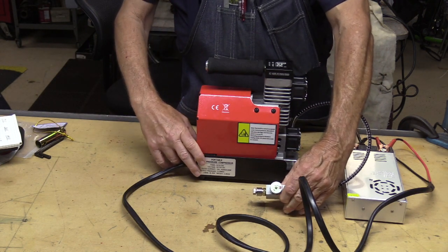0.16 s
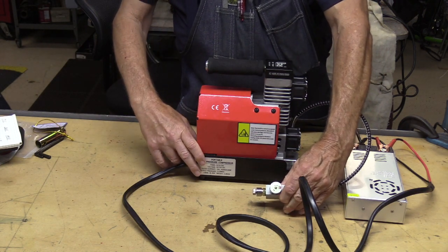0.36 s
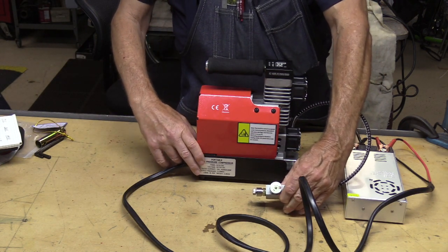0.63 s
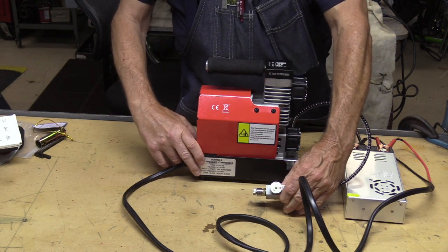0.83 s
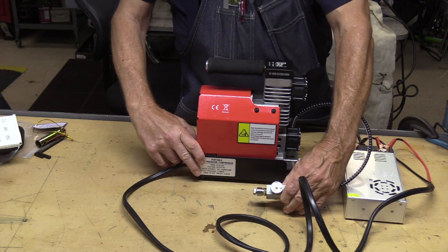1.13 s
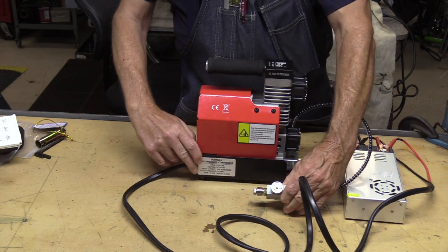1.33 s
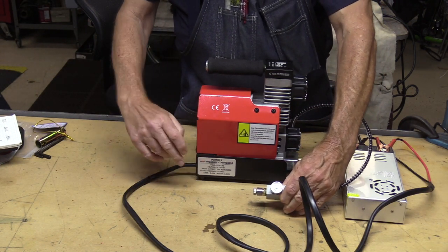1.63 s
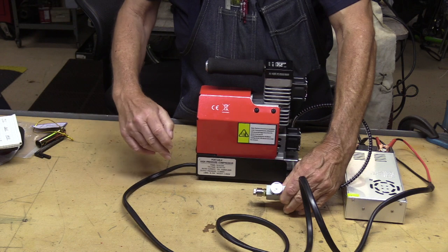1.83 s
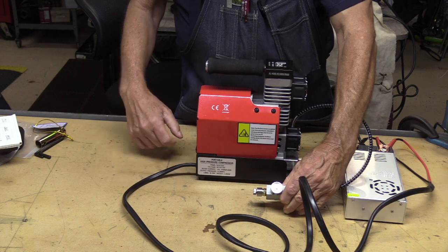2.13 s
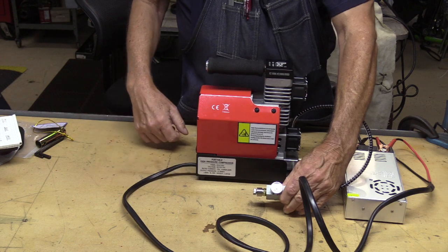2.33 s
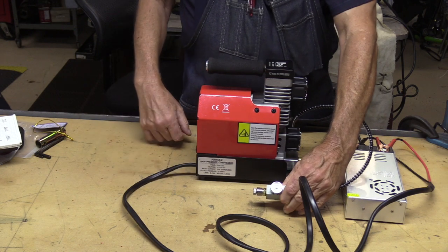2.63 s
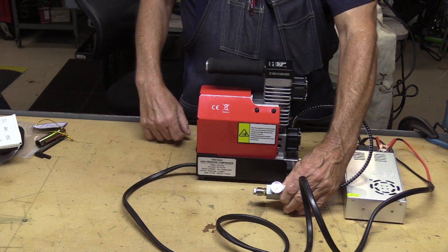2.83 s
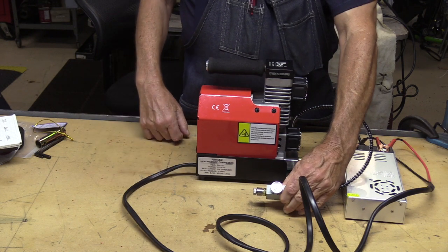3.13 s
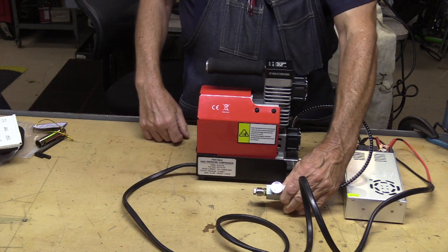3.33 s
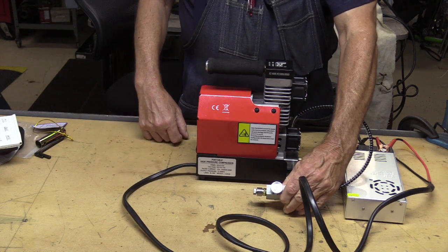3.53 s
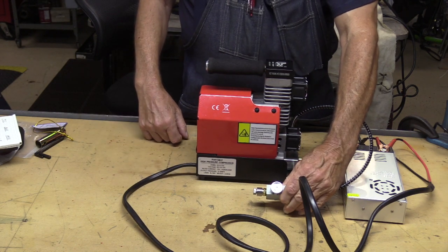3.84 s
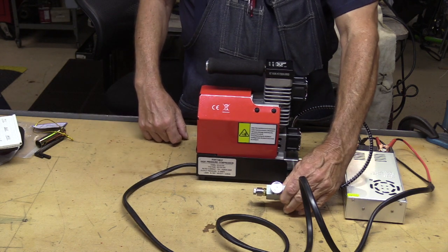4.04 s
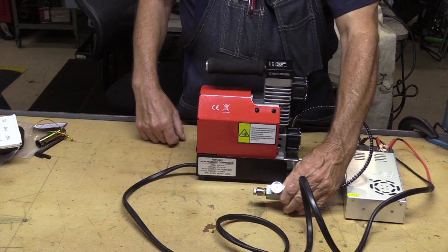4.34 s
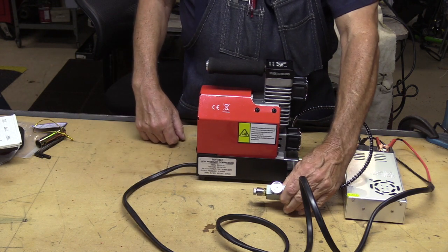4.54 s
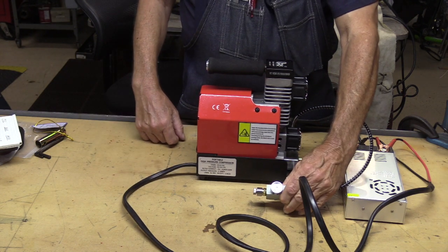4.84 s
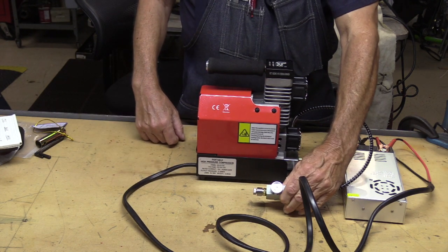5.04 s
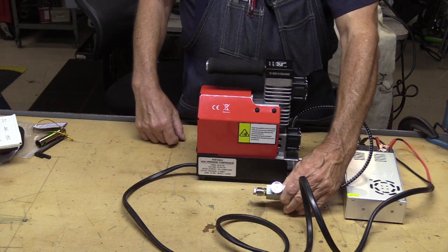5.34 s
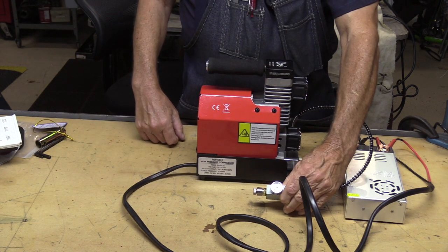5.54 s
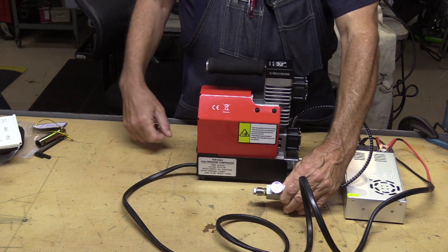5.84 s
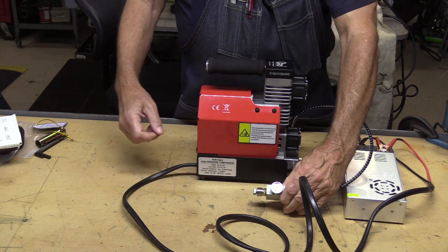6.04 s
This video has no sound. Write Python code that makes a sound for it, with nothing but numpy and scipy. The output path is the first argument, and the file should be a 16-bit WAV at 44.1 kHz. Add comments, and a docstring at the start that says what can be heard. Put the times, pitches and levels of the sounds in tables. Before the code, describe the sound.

Steady high fan whine and airflow; after a second a small compressor snaps on, its rapid thumping and hooting pulses growing fuller, close up.

```python
"""A small high-pressure air compressor on a workbench, close to the microphone: two cooling fans whine as
blade-rate tones over rushing air, which is coloured noise, and a thin hum. After a second come a clunk and a
spit of air, a switch tocks, the motor rumbles up as shaped noise and a gear tone, and the sagging supply slows
both fans. On every stroke the intake reed hoots (tone bursts), the valve thumps (low pulses), air spurts and
the head rattles (noise), and the piston knocks on the crankcase (ringing modes)."""
import sys
import numpy as np
from scipy import signal
from scipy.fft import rfft, irfft
from scipy.io import wavfile

SR = 44100
rng = np.random.default_rng(int(sys.argv[2]) if len(sys.argv) > 2 else 0)


def inscribe(sig):
    """Save sig as 16-bit PCM at rate SR to the path in sys.argv[1].

    A 1-D sig is mono; a 2-D sig holds one channel per row.
    Samples are clipped to [-1, 1] before scaling.
    """
    pcm = np.round(np.clip(np.atleast_2d(sig).T, -1, 1) * 32767)
    wavfile.write(sys.argv[1], SR, pcm.astype(np.int16))


N = 272570
TIME = np.arange(N) / SR  # s


def undb(db):
    """Decibels to gain."""
    return 10 ** (np.asarray(db) / 20)


def unit(x):
    """Scale to rms 1."""
    return x / np.std(x)


def curve(rows):
    """Each column of a timed table, interpolated sample by sample."""
    s, *columns = np.transpose(rows)
    return [np.interp(TIME, s, column) for column in columns]


def walk(rate_hz):
    """Smooth chance of spread 1 that changes about rate_hz times a second."""
    rolloff = 1 + (np.fft.rfftfreq(N, 1 / SR) / rate_hz) ** 2
    return unit(irfft(rfft(rng.standard_normal(N)) / rolloff, N))


def colour(x, points, peaks=()):
    """Filter by a broad spectrum with the power of resonances added; rms 1."""
    f = np.fft.rfftfreq(N, 1 / SR) + 1e-3  # keeps the logarithm finite
    hz, db = np.transpose(points)
    power = undb(np.interp(np.log(f), np.log(hz), db)) ** 2
    for centre_hz, width_hz, peak_db in peaks:
        power = power + undb(peak_db) ** 2 / (1 + ((f - centre_hz) / width_hz) ** 2) ** 2
    return unit(irfft(rfft(x) * np.sqrt(power), N))


def add(out, s, sound):
    """Mix a short sound in at time s."""
    i = int(np.clip(s * SR, 0, N))
    out[i:i + len(sound)] += sound[:N - i]


def burst(hz, length_s):
    """A tone that swells and dies within length_s, symmetric about its middle."""
    n = int(length_s * SR)
    return np.hanning(n) * np.cos(2 * np.pi * hz * (np.arange(n) - n / 2) / SR)


def ring(hz, t60_s, t, wave=np.sin):
    """A struck mode that falls by 60 dB in t60_s."""
    return wave(2 * np.pi * hz * t) * np.exp(-np.log(1000) * t / t60_s)


# Brief level changes, relative: middle_s, length_s, whine_db [dB], air_db [dB]
DIPS = [(0.406, .14, 1, -1.5), (0.703, 0.12, -30, -2), (1.033, .1, 0, -2), (1.39, 0.28, -2.5, -2),
        (1.68, 0.15, -19, -1), (2.1, 0.17, -5.5, -2), (2.25, 0.13, -4, -1.9), (2.57, 0.14, -12, -2),
        (2.886, 0.24, -3, -1.2), (4.46, 0.13, -7.5, -2), (4.76, 0.12, -4, -2.2), (5.815, 0.13, -4, -1.7)]


def dips():
    """Smooth brief level changes in dB: one row for the whine, one for the air."""
    whine, air = np.zeros((2, N))
    for s, length_s, whine_db, air_db in DIPS:
        shape = np.hanning(int(length_s * SR))
        add(whine, s - length_s / 2, whine_db * shape)
        add(air, s - length_s / 2, air_db * shape)
    return whine, air


SWITCH_S = 1.047  # the power switch snaps
EASING_S = 18  # time constant of the easing of the pump's running load


def fan_speed(idle_hz, slowing_s, inrush_hz, recover_s, load_hz, wander_hz):
    """The pump's inrush drags a fan's blade rate down; it recovers to a little under its idle rate."""
    t = np.maximum(TIME - SWITCH_S, 0)
    load = inrush_hz * np.exp(-t / recover_s) + load_hz * np.exp(-t / EASING_S)
    sag = (1 - np.exp(-t / slowing_s)) * load
    return idle_hz - sag + wander_hz * walk(1.96)


def fan(hz, db, tones, flutter_db, flutter_hz, wobble, count=1):
    """Tones on multiples of blade rate / count; turbulent inflow shakes their level and phase (radians)."""
    phase = 2 * np.pi * np.cumsum(hz / count) / SR
    out = 0
    for multiple, tone_db, share in tones:
        swing_db = share * (db - db.mean()) + flutter_db * walk(flutter_hz)
        level = undb(db.mean() + tone_db + swing_db)
        out = out + level * np.sin(multiple * phase + wobble * walk(flutter_hz))
    return np.sqrt(2) * out


# Blade rates of the two fans before the pump loads the supply
MAIN_HZ, SMALL_HZ = 1848.5, 1685
# Tones of the louder fan: multiple of its blade rate, relative level_db, share of the level swings [0-1]
MAIN_TONES = [(1, 0, 0.64), (2, -22.5, 0.7)]
# Tones of the smaller, five-bladed fan: multiple of its shaft rate, relative level_db, share of swings [0-1]
SMALL_TONES = [(1, -11.5, 0.35), (5, -0.5, 0.2), (10, -4, 0.28), (15, 0.5, 0.8)]
# Loudness of the louder fan, before trim: time_s, level_db
MAIN_LEVEL = [(0, -16.5), (1.45, -16.5), (1.95, -13), (2.85, -14.5), (3.9, -17), (4.25, -12.5),
              (6.18, -15.5)]
# Loudness of the smaller fan, before trim: time_s, level_db
SMALL_LEVEL = [(0, -23), (.5, -21), (1.02, -23.5), (1.13, -35), (1.3, -28), (1.6, -23.5), (2.08, -24),
               (2.2, -31), (3.4, -29), (4, -33.5), (4.45, -26), (6.18, -25.5)]


def fans(main_trim_db=-1.0, small_trim_db=-1.0, small_dip=0.14):
    """Two cooling fans on the same supply whine at their blade rates; small_dip is the smaller one's share of dips."""
    (main_level,), (small_level,) = curve(MAIN_LEVEL), curve(SMALL_LEVEL)
    dip_db, _ = dips()
    main_hz = fan_speed(MAIN_HZ, slowing_s=0.02493, inrush_hz=83.67, recover_s=.27,
                        load_hz=30.26, wander_hz=0.835)
    small_hz = fan_speed(SMALL_HZ, slowing_s=.055, inrush_hz=135.17, recover_s=.12,
                         load_hz=47, wander_hz=2.8)
    main_db = main_level + dip_db + main_trim_db
    small_db = small_level + small_dip * dip_db + small_trim_db
    main = fan(main_hz, main_db, MAIN_TONES, flutter_db=1.14, flutter_hz=22.2, wobble=0.16)
    small = fan(small_hz, small_db, SMALL_TONES, flutter_db=1.5, flutter_hz=16, wobble=0.19, count=5)
    return main + small


# Air through the housings, before gain: time_s, level_db
DRAUGHT = [(0, -21), (1.9, -21), (2.9, -21.5), (3.3, -21), (6.18, -21.5)]
# Broad colour of that air: pitch_hz, relative level_db [dB per Hz]
AIR = [(30, -25.5), (150, -18), (280, -14), (380, -3.5), (490, -7.5), (720, -4), (1100, 2.5), (1400, -1.5),
       (2250, -0.5), (2700, -7), (4200, -11), (5300, -7), (6100, -13.5), (6900, -16.5), (12000, -20)]
# Ducts and fins that the air rings: pitch_hz, width_hz, relative level_db
DUCTS = [(1724, 148, 6), (1772, 110, 6), (1120, 70, -8.5), (850, 25, -7), (970, 22, -12), (695, 31, -3),
         (4400, 120, -13), (6140, 200, -12.5), (8220, 150, -18.5)]


def draught(gain_db=6.5, flicker_db=0.89):
    """Cooling air rushes through ducts and fins: turbulent noise with their resonances."""
    (level_db,), (_, dip_db) = curve(DRAUGHT), dips()
    rush = colour(rng.standard_normal(N), AIR, DUCTS)
    return rush * undb(level_db + dip_db + gain_db + flicker_db * walk(19))


def hum(hz=867, level_db=-33.5, waver_db=3.5, wobble=0.43):
    """A thin tone at a fixed pitch wavers in level and phase (radians) under the rush of air."""
    return undb(level_db + waver_db * walk(6.7)) * np.sin(2 * np.pi * hz * TIME + wobble * walk(6))


TURN_S = .1562  # the crank turns once
# The beat slips now and then; each even run of strokes begins at: start_s
RUNS = [1.243, 1.416, 1.711, 2.208, 2.665, 3.111, 4.532, 5.294]


def stroke_times():
    """The valve opens once a turn, evenly within each run."""
    ends = RUNS[1:] + [N / SR]
    return np.concatenate([np.arange(start, end - TURN_S / 2, TURN_S) for start, end in zip(RUNS, ends)])


def crank_angle():
    """Turns of the crank, a whole number at each valve thump."""
    times = stroke_times()
    times = np.r_[times[0] - TURN_S, times, times[-1] + TURN_S]
    return np.interp(TIME, times, np.arange(len(times)))


# Back pressure makes valves and gears sing: time_s, relative level_db
PRESSURE = [(1.2, -19), (1.9, -9.5), (2.4, -1), (3, -5.5), (4, 0), (6.18, 1)]
# A few early strokes come out weak: time_s
WEAK = [2.21, 2.52, 2.82, 2.98]


def strokes(follow, weak_db, spread_db):
    """Rows (s, dB): a stroke's force follows the back pressure, with a little chance."""
    s = stroke_times()
    weak = np.abs(s[:, None] - WEAK).min(axis=1) < TURN_S / 2
    pressure_db = np.interp(s, *np.transpose(PRESSURE))
    db = follow * pressure_db + weak_db * weak + spread_db * rng.standard_normal(len(s))
    return list(zip(s, db))


FIRST_CLUNK_S = 1  # a first clunk and spit of air, just before the switch tocks
ROD_LEAD_S = .041  # the rod clunks this long before the valve opens
# Back pressure holds the rod in its play: time_s, relative clunk level_db
ROD_PLAY = [(1.2, 1), (1.55, 2), (2.45, -1), (2.95, -10), (3.3, -18), (6.18, -4.5)]


def clunks(first_db=-5):
    """Rows (s, dB): a first clunk, then the connecting rod takes up its play before each stroke."""
    s = stroke_times() - ROD_LEAD_S
    return [(FIRST_CLUNK_S, first_db)] + list(zip(s, np.interp(s, *np.transpose(ROD_PLAY))))


def thumps(valve_hz=250, valve_s=0.012, valve_db=-17.0, rod_hz=130, rod_s=0.013, rod_db=-19,
           rock_hz=52, rock_s=0.031, rock_lag_s=0.028, rock_db=-37, sway_lead_s=0.063, sway_db=-41):
    """Short dull pressure pulses from valve and rod; each stroke also rocks the bench to and fro."""
    out = np.zeros(N)
    rock = burst(rock_hz, rock_s)
    for s, db in strokes(follow=0.29, weak_db=-9, spread_db=1.7):
        add(out, s - valve_s / 2, -undb(db + valve_db) * burst(valve_hz, valve_s))
        add(out, s - sway_lead_s, -undb(sway_db) * rock)
        add(out, s + rock_lag_s, undb(rock_db) * rock)
    for s, db in clunks():
        add(out, s - rod_s / 2, -undb(db + rod_db) * burst(rod_hz, rod_s))
    return out


# Crankcase modes: pitch_hz (before scatter), t60_s, relative level_db
CASE = [(230, 0.015, -10), (402, 0.016, 4), (602, 0.036, 0.5), (730, 0.014, 4), (886, 0.021, -0.5),
        (1006, 0.01, 7.5), (1290, 0.014, -1)]


def knocks(lag_s=0.029, piston_db=-16.5, rod_db=-20, scatter_db=1.5):
    """Piston, just over dead centre, and rod strike the crankcase modes, a little differently each time."""
    out, t = np.zeros(N), TIME[:SR // 10]
    hz, t60_s, mode_db = np.transpose(CASE)[:, :, None]
    piston = strokes(follow=0.47, weak_db=-16, spread_db=1.3)
    blows = [(s + lag_s, db + piston_db) for s, db in piston]
    blows += [(s, db + rod_db) for s, db in clunks()]
    chances = rng.standard_normal((len(blows), 2, len(CASE), 1))
    for (s, db), (detune, scatter) in zip(blows, chances):
        rings = ring(hz * (1 + 0.033 * detune), t60_s, t, np.cos)
        add(out, s, np.sum(undb(db + mode_db + scatter_db * scatter) * rings, axis=0))
    # the oil film softens the contact
    return signal.sosfilt(signal.butter(2, 1500, fs=SR, output="sos"), out)


# Colour of the escaping air: pitch_hz, relative level_db [dB per Hz]
SPURT = [(500, -9), (1200, 24.5), (2500, -35), (3500, -2), (5000, 14), (7000, -16), (8400, 5.5), (10000, 4),
         (12000, 5)]


def spurts(gain_db=-18.5, decay_s=0.046, rise_s=0.0012, lead_s=0.001, crack=0.26, crack_s=0.0061, first_db=-16):
    """Air cracks through the opening valve and hisses on until the pressures even out."""
    flow, t = np.zeros(N), TIME[:SR // 5]
    opening = np.exp(-t / crack_s)
    puff = (1 - np.exp(-t / rise_s)) * (np.exp(-t / decay_s) + crack * opening)
    for s, db in strokes(follow=0, weak_db=-5, spread_db=1.1):
        add(flow, s - lead_s, undb(db + gain_db) * puff)
    add(flow, FIRST_CLUNK_S, undb(first_db) * opening)
    return flow * colour(rng.standard_normal(N), SPURT)


# Modes of the plastic cover: pitch_hz, t60_s, level_db
COVER = [(204, 0.036, -37), (382, 0.055, -17), (690, 0.051, -11.5)]


def switch():
    """The power switch snaps and rings the plastic cover: a dull tock of decaying modes."""
    out, t = np.zeros(N), TIME[:SR // 10]
    for hz, t60_s, db in COVER:
        add(out, SWITCH_S, undb(db) * ring(hz, t60_s, t))
    return out


# Pump motor and gears, before load and dips: time_s, level_db
MOTOR = [(0, -88), (1.03, -85), (1.12, -23), (1.6, -24.5), (2.6, -27), (4, -26.5), (6.18, -27.5)]
# Colour of their rumble: pitch_hz, relative level_db [dB per Hz]
RUMBLE = [(25, -7), (70, -13), (140, -4.5), (250, -6), (370, 2.5), (480, -5), (650, -8), (900, -10.5),
          (1300, -17), (2000, -5.5), (4000, -15), (12000, -25)]
# Resonances of the frame: pitch_hz, width_hz, relative level_db
FRAME = [(410, 34, -4), (577, 43, 3.5), (717, 30, 5.5), (1260, 23, 11)]


def motor(rattle_db=3, repeat=0.4, load_db=3.5, load_turn=0.18,
          gear_hz=1260, gear_db=-1, gear_flutter_db=3, gear_load_db=4):
    """Gears rattle into the frame, hardest under compression; part of the chatter repeats on every crank turn."""
    (level_db,), (push_db,) = curve(MOTOR), curve(PRESSURE)
    load = np.cos(2 * np.pi * (crank_angle() - load_turn))  # peaks load_turn after the thump
    chatter = rng.standard_normal(N) * undb(rattle_db * walk(114))
    # one fixed piece of shuffled chatter, centred on each stroke
    pattern = rng.permutation(chatter[:SR // 6]) * signal.windows.tukey(SR // 6, .2)
    teeth = np.zeros(N)
    for s in stroke_times():
        add(teeth, s - 1 / 12, pattern)
    mixed = np.sqrt(1 - repeat) * chatter + np.sqrt(repeat) * teeth
    rumble = colour(mixed, RUMBLE, FRAME) * undb(load_db * load)
    mesh = np.sin(2 * np.pi * np.cumsum(gear_hz * (1 + 0.00287 * walk(8.3))) / SR)
    mesh_db = gear_db + push_db + gear_flutter_db * walk(13) + gear_load_db * load
    return undb(level_db) * (rumble + mesh * undb(mesh_db))


def reeds(intake_hz=409, intake_db=-18.5, intake_s=.07, lead_s=.057,
          third_db=-21, third_s=0.044, third_lead_s=.032,
          outlet_hz=1235, outlet_db=-20, outlet_s=.034, outlet_lag_s=0.008,
          return_db=-28, return_s=.06, return_lag_s=0.051, flutter_db=2):
    """The intake reed hoots before each thump and, softly, on the return; the outlet reed chirps after the thump."""
    out, rows = np.zeros(N), strokes(follow=0.65, weak_db=-1.0, spread_db=-0.4)
    chances = rng.standard_normal((len(rows), 3))
    for (s, db), (detune, force, outlet_detune) in zip(rows, chances):
        hz = intake_hz * (1 + 0.0035 * detune)
        chirp = burst(outlet_hz * (1 + 0.007 * outlet_detune), outlet_s)
        add(out, s - lead_s, undb(intake_db + db) * burst(hz, intake_s))
        add(out, s - third_lead_s, undb(third_db + db) * burst(3 * hz, third_s))  # third harmonic
        add(out, s + return_lag_s, undb(return_db + db) * burst(hz, return_s))
        add(out, s + outlet_lag_s, undb(outlet_db + db + 2.8 * force) * chirp)
    return out * undb(flutter_db * walk(66))


# Colour of the cylinder head's rattle: pitch_hz, relative level_db [dB per Hz]
HEAD = [(200, -25), (600, -2.5), (1250, 0), (1700, -8), (3000, -7), (5500, -11), (9000, -22.5)]


def rattle(gain_db=-21, lead_s=0.0083, length_s=0.064, grain_db=3, grain_hz=150):
    """The cylinder head rattles, as grainy noise, while the piston pushes against the line."""
    shake = np.zeros(N)
    for s, db in strokes(follow=0.37, weak_db=-10, spread_db=1.0):
        add(shake, s - lead_s, undb(db + gain_db) * np.hanning(int(length_s * SR)))
    return shake * colour(rng.standard_normal(N) * undb(grain_db * walk(grain_hz)), HEAD)


def workshop(x, wet_db=-14, t60_s=0.57, gap_s=0.02, low_hz=130):
    """Bench and cluttered walls add a short diffuse tail of decaying noise."""
    t = TIME[:SR // 2]
    tail = rng.standard_normal(len(t)) * np.exp(-np.log(1000) * t / t60_s) * (t > gap_s)
    tail = signal.sosfilt(signal.butter(2, low_hz, "high", fs=SR, output="sos"), tail)
    return x + undb(wet_db) * signal.fftconvolve(x, tail / np.linalg.norm(tail))[:N]


def scene(motor_dip=1.5):
    """Fans and pump, heard from one place; the motor dips motor_dip times as many dB as the air."""
    _, dip_db = dips()
    strikes = switch() + reeds() + thumps() + knocks() + spurts() + rattle()
    pump = motor() * undb(motor_dip * dip_db) + workshop(strikes)
    return (fans() + hum() + draught() + pump)[None]


def record(dry, top_hz=11900):
    """The infrasound is dropped, the highest peaks are rounded and nothing sounds above top_hz."""
    dry = signal.sosfilt(signal.butter(3, 22, "high", fs=SR, output="sos"), dry)
    rounded = dry / (1 + (dry / .93) ** 8) ** (1 / 8)
    return signal.sosfilt(signal.ellip(10, .2, 80, top_hz, fs=SR, output="sos"), rounded)


dry = scene()
out = record(dry)
inscribe(out)
```